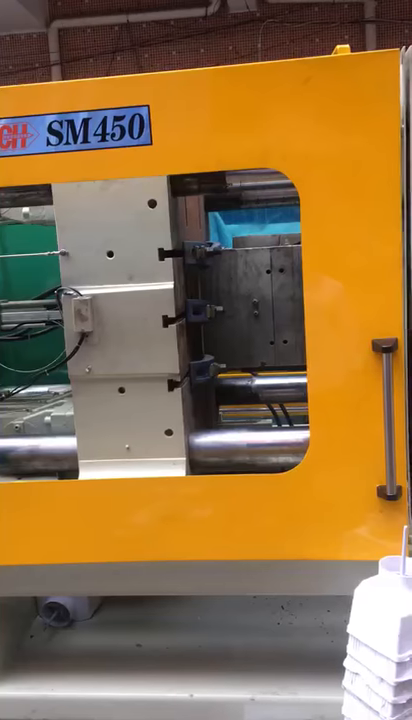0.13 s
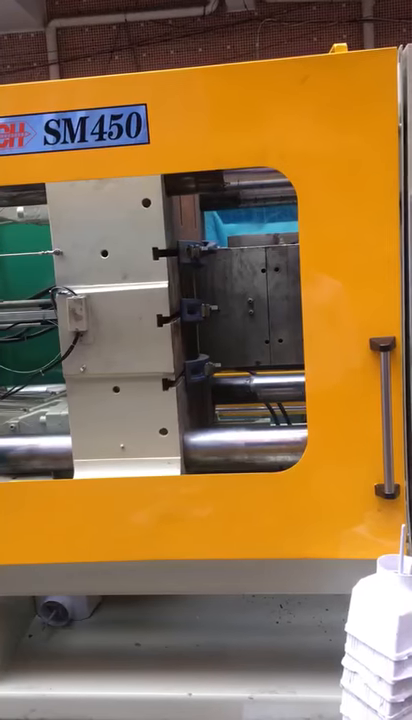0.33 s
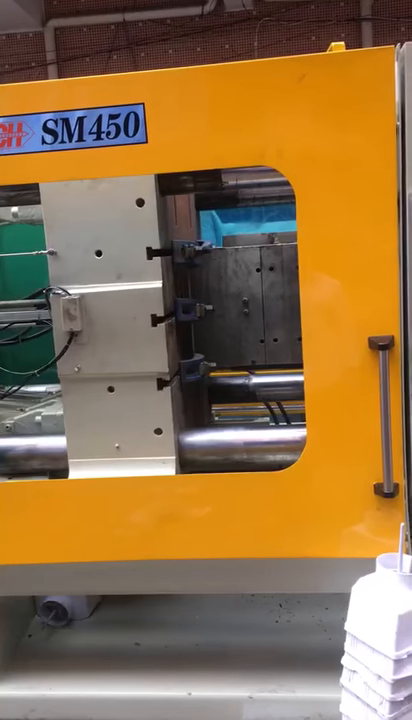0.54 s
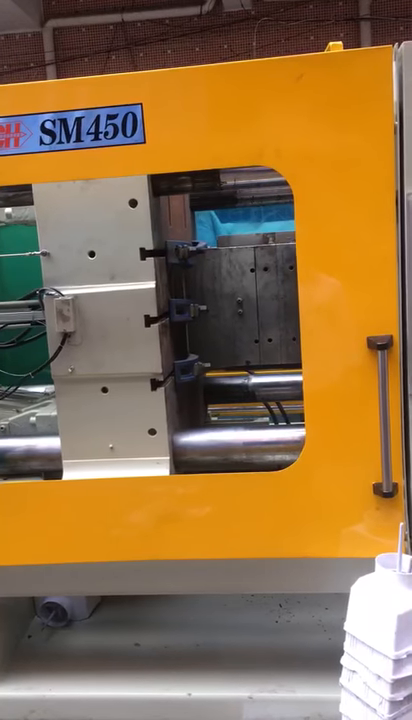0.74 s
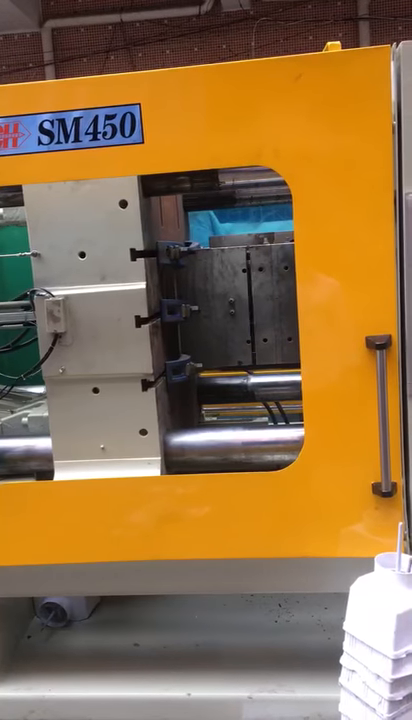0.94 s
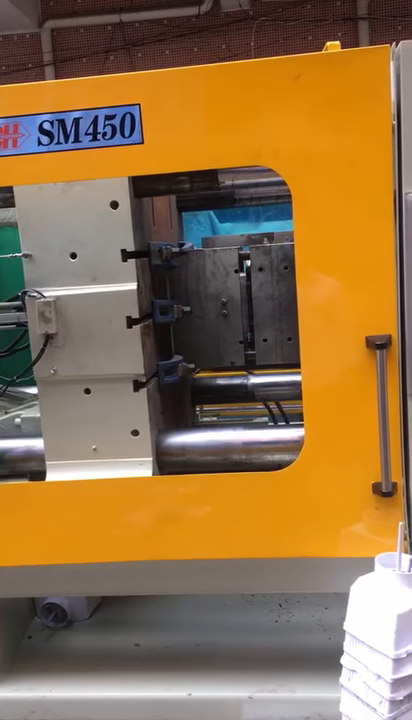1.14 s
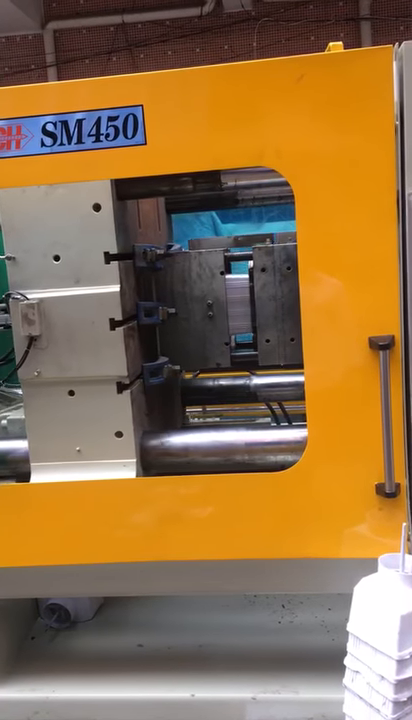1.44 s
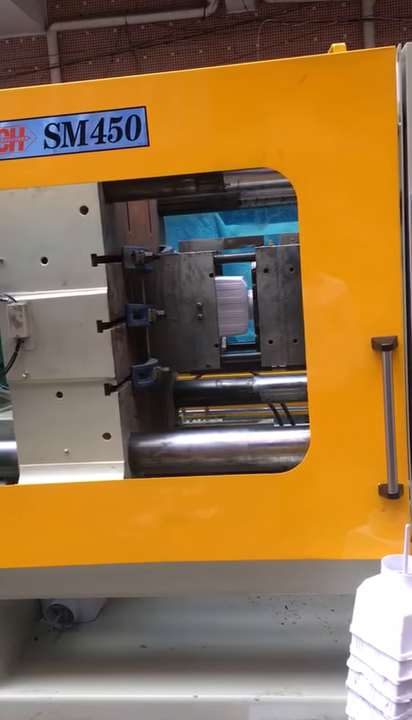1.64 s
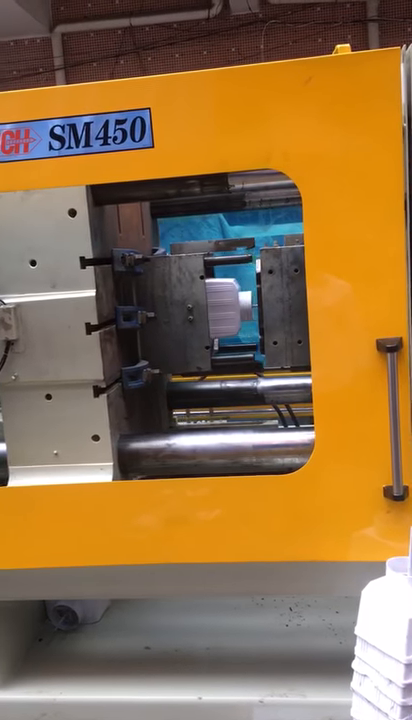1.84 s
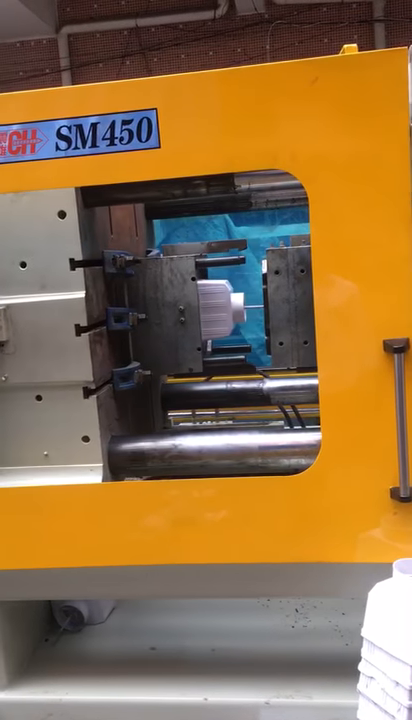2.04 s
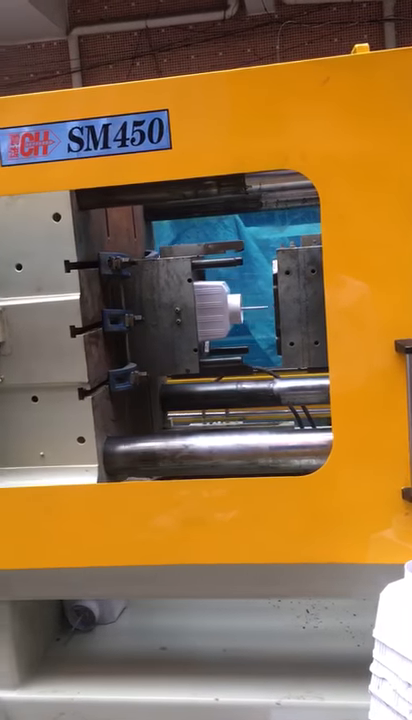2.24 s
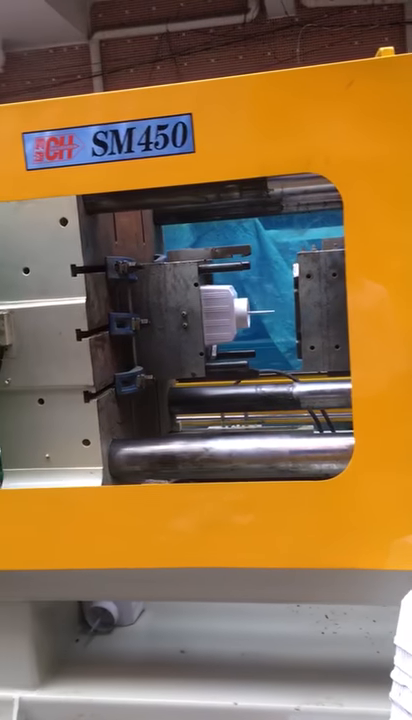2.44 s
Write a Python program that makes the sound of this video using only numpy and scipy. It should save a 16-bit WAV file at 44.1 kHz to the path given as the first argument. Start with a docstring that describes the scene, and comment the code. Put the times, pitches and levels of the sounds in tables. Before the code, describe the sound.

Steady hydraulic pump whine and oil hiss from a factory molding machine, with metallic clunks as it opens

```python
"""A factory hall, one microphone channel: a large molding machine with a twelve-vane hydraulic pump runs.
The pump's whine is a set of tones locked to its shaft, over coloured noise for oil rush and floor rumble.
As the mold unlocks and slides open, linkages rattle (noise bursts) and tick (ringing parts with a crack),
and the frame thumps (decaying low tones). Only the linkage gets a hall tail. The sound starts abruptly."""
import sys
import numpy as np
from scipy import signal
from scipy.fft import rfft, irfft, next_fast_len
from scipy.io import wavfile
from scipy.ndimage import uniform_filter1d, map_coordinates

SR = 44100
rng = np.random.default_rng(int(sys.argv[2]) if len(sys.argv) > 2 else 0)


def int16_out(signal):
    """Quantize to a 16-bit WAV file."""
    q = np.round(np.clip(np.atleast_2d(signal).T, -1, 1) * 32767)
    wavfile.write(sys.argv[1], SR, q.astype(np.int16))


N = 113778
T = np.arange(N) / SR  # time [s]
START_S, TOP_HZ = .1137, 15730  # silence before, nothing above

SHAFT_HZ, VANES = 24.906, 12
VANE_DB, SHAFT_ANGLE = -27.5, 2.87  # vane tone rms at 0 dB pressure; shaft angle at 0 s [rad]
SWAY, SWAY_TWICE = .73, -.13  # phase sway once and twice a turn [rad]
WAVER_DB, WANDER = 1.0, .004  # slow drift of each order: level [dB], phase [rad per order]
# Level swells of the vane tone: (times a turn, depth [fraction], shaft phase [rad])
VANE_SWELLS = [(1, .17, 2.3), (2, .32, -2.15), (3, .05, -.9)]
# Oil pressure, as its effect on the vane tone: (time [s], level [dB])
OIL_PRESSURE = [(.12, -2.5), (.4, 0), (.65, -2.5), (.9, -0.5), (1.2, 1), (1.5, 1), (1.8, 0.5), (2.1, 0.5),
                (2.58, 0.5)]
# Steady tones of the pump: (shaft order, rms level [dB], gain per dB of pressure [dB])
SHAFT_ORDERS = [(1, -44, 2), (16, -46, -1), (18, -58, 0), (24, -48, -.6), (25, -54, 0), (36, -38, 1.3),
                (38, -58, 0), (44, -57, 0), (47, -54, 0), (48, -48, -.5), (50, -58, 0), (59, -56, 0),
                (60, -49, -.6), (65, -62, 0), (71, -59, 0), (72, -43, -.5), (73, -56, 0), (84, -39.5, 0),
                (96, -51, -.6), (97, -54, 0), (101, -55, 0), (103, -57, 0), (105, -58, 0), (108, -47, .8),
                (109, -57, 0), (113, -56, 0), (115, -58, 0), (119, -59, 0), (127, -55, 0), (155, -60, 0),
                (204, -67, 0), (240, -68, 0), (360, -59, .6), (408, -72, 0), (432, -72, 0), (444, -72, 0),
                (456, -71, 0), (468, -69, 0), (481, -72, 0), (492, -73, 0), (504, -69, 0), (516, -71, 0),
                (527, -69, 0), (540, -65, 0), (564, -73, 0), (576, -76, 0), (612, -75, 0), (625, -75, 0)]

# Oil rush and hall noise: (frequency [Hz], density [dB per Hz])
OIL_RUSH = [(150, -61.5), (300, -62.5), (450, -72.5), (800, -74), (1500, -74.5), (2400, -72), (3800, -75),
            (4500, -77.5), (4900, -86), (5300, -82), (6500, -78.5), (7800, -84.5), (9000, -82.5),
            (10000, -84), (10500, -92), (11000, -88), (13400, -88), (14500, -90), (15600, -95)]
# Floor rumble: (frequency [Hz], density [dB per Hz])
FLOOR_RUMBLE = [(15, -68), (28, -51), (48, -54), (62, -55.5), (76, -47), (95, -59.5), (125, -59),
                (165, -56), (210, -69.5), (300, -62)]

# Rattles of loose steel: (time [s], length [s], rms level [dB], rms level of the dull knocking under it [dB])
STEEL_RATTLES = [(.112, .03, -33, -36), (.135, .045, -30, -35), (.18, .06, -38, -36), (.26, .06, -37, -29),
                 (.85, .045, -36.5, -40), (1.042, .008, -42, -50), (1.24, .04, -42, -45),
                 (1.512, .017, -27.5, -37), (1.528, .06, -37, -35), (2.455, .03, -43, -50)]
# Tone of the bright rattle: (frequency [Hz], gain [dB])
STEEL_COLOUR = [(400, -4.5), (1100, -2), (2500, 2), (4200, -6), (9000, -11), (15000, -23.5)]
# Tone of the dull knocking: (frequency [Hz], gain [dB])
DULL_COLOUR = [(110, -12), (250, 2.5), (420, -7.5), (700, -14.5), (1200, -12.5), (2000, -44), (4000, -120)]

# Linkage ticks: (time [s], level before the rise [dB], frequency of the part that rings [Hz])
LINKAGE_TICKS = [(.144, -22, 3720), (0.144, -24.5, 1500), (.165, -19, 4100), (.167, -25, 5700),
                 (.168, -22, 1190), (.272, -27, 2600), (0.284, -24, 2450), (.279, -25, 960),
                 (.855, -34, 3300), (1.043, -19, 2480), (1.042, -25, 3180), (1.513, -16.5, 2180),
                 (1.514, -21, 9800), (1.516, -17, 4390), (1.513, -22, 7900), (1.52, -16, 4290),
                 (1.521, -29, 2330), (1.526, -24, 3040), (2.462, -24.5, 2490)]
TICK_CYCLES = 60  # cycles for a ring to fall 60 dB
CRACK, BLUR = .3, .06  # contact noise against the ring; phase scatter a sample [rad]
# Frame thumps: (time [s], level before the rise [dB], frequency [Hz], rise [s], fall by 60 dB [s])
FRAME_THUMPS = [(.262, -18, 60, .012, .2), (.295, -17, 270, .006, .08), (.3, -20, 144, .012, .45),
                (.675, -17, 58, .012, .15), (.865, -5, 66, .012, .07), (1.523, -8.5, 82, .022, .33),
                (1.636, -12, 80, .04, .3), (1.96, -24, 55, .02, .2)]
HALL_T60_S, HALL_DB = 0.52, -12


def amp(db):
    """Decibels to a linear gain."""
    return 10 ** (np.asarray(db) / 20)


def unit(x):
    """Scale to an rms of one."""
    return x / np.sqrt(np.mean(x ** 2) + 1e-20)


def wobble(rate):
    """A smooth random curve, rate knots a second."""
    knots = rng.standard_normal(int(N * rate / SR) + 4)
    return map_coordinates(knots, [T * rate])


def filtered(x, response):
    """Multiply the spectrum of x by a response of frequency [Hz]."""
    m = next_fast_len(N + SR // 2)
    return irfft(rfft(x, m) * response(np.fft.rfftfreq(m, 1 / SR)), m)[:N]


def colour(points):
    """Gain curve through (Hz, dB) points on a log axis, closed below the first."""
    closed = [(points[0][0] / 2, -140)] + list(points)
    f, db = np.transpose(closed)
    return lambda hz: amp(np.interp(np.log(hz + 1), np.log(f + 1), db))


def noise(points, patchy_db):
    """Coloured noise whose gain varies in random patches of time and frequency."""
    z = signal.stft(rng.standard_normal(N + 512), nperseg=512)[2]
    across_bins = uniform_filter1d(rng.standard_normal(z.shape), 6, 0)
    patches = unit(uniform_filter1d(across_bins, 10, 1))
    white = unit(signal.istft(z * amp(patchy_db * patches), nperseg=512)[1][:N])
    return filtered(white * np.sqrt(SR / 2), colour(points))  # white density is 0 dB per Hz


def vane_tone(turn, pressure_db):
    """The vanes pass twelve times a turn; level and phase sway with the shaft angle."""
    angle = turn + SHAFT_ANGLE
    swell = 1 + sum(depth * np.cos(k * angle + at) for k, depth, at in VANE_SWELLS)
    sway = SWAY * np.sin(angle) + SWAY_TWICE * np.sin(2 * angle)
    tone = unit(swell * np.cos(VANES * turn + sway))
    return -amp(VANE_DB + pressure_db) * tone


def pump():
    """Oil pressure scales the vane tone; the other orders are tones at multiples of the shaft rate."""
    pressure_db = np.interp(T, *np.transpose(OIL_PRESSURE))
    turn = 2 * np.pi * SHAFT_HZ * T
    out = vane_tone(turn, pressure_db)
    drift = WANDER * wobble(3)  # shared by all these orders
    for k, db, follows in SHAFT_ORDERS:
        phase = k * (turn + drift) + rng.uniform(0, 2 * np.pi)
        level_db = db + follows * pressure_db + WAVER_DB * wobble(4)
        out += amp(level_db) * np.sqrt(2) * np.cos(phase)
    return out


def oil_rush():
    """Broad noise of oil flow and hall, its level drifting at two rates."""
    drift_db = 0.13 * wobble(4.05) + 0.59 * wobble(12.26)
    return amp(drift_db) * noise(OIL_RUSH, patchy_db=1.53)


def floor_rumble():
    """Lumpy low noise from the floor, falling away above 300 Hz."""
    return amp(0.5 * wobble(7.18)) * noise(FLOOR_RUMBLE + [(500, -120)], patchy_db=1.5)


def rattles():
    """Dense uneven contacts of loose steel: bursts of bright grains over dull knocking."""
    out = np.zeros(N)
    uneven = rng.standard_normal(N) * amp(1.2 * wobble(500))
    grains = unit(filtered(uneven, colour(STEEL_COLOUR)))
    knocks = unit(filtered(rng.standard_normal(N), colour(DULL_COLOUR)))
    for s, length, db, knock_db in STEEL_RATTLES:
        corners = s + length * np.array([0, .15, .7, 1.3])
        envelope = np.interp(T, corners, [0, 1, 1, 0])
        out += (amp(db) * grains + amp(knock_db) * knocks) * envelope
    return out


def ticks():
    """Each contact cracks briefly and rings one steel part, higher parts dying sooner."""
    out, t = np.zeros(N + SR), T[:SR // 8]
    for s, db, hz in LINKAGE_TICKS:
        scatter = np.cumsum(rng.normal(0, BLUR, len(t)))
        ring = amp(-60 * t * hz / TICK_CYCLES) * np.sin(2 * np.pi * hz * t + scatter)
        crack = CRACK * amp(-60 * t / 0.0047) * rng.standard_normal(len(t))
        rise = 1 - np.exp(-t / 0.00018)
        out[round(s * SR):][:len(t)] += amp(db) * rise * (ring + crack)
    return out[:N]


def hall(x):
    """A dull tail from the hall: low-passed noise with exponential decay."""
    dull = signal.lfilter([1], [1, -.6], rng.standard_normal(SR // 2))
    tail = dull * amp(-60 * T[:SR // 2] / HALL_T60_S)
    late = np.pad(x, (500, 0))  # the tail starts 500 samples after the direct sound
    return signal.fftconvolve(late, tail / np.linalg.norm(tail))[:N]


def thumps():
    """Soft pushes ring the heavy frame as decaying sines."""
    out = np.zeros(N)
    for s, db, hz, rise, t60 in FRAME_THUMPS:
        t = np.maximum(T - s, 0)
        push = 1 - np.exp(-t / rise)
        out += amp(db - 60 * t / t60) * push * np.sin(2 * np.pi * hz * t)
    return out


def scene():
    """Pump, noise and thumps dry; the linkage both direct and through the hall."""
    machine = pump() + oil_rush() + floor_rumble()
    linkage = rattles() + ticks()
    return (machine + linkage + amp(HALL_DB) * hall(linkage) + thumps())[None]


def record(dry):
    """One microphone channel: silent until the abrupt start, nothing above the band limit."""
    started = dry[0] * (T > START_S)
    return filtered(started, lambda hz: hz < TOP_HZ)[None]


dry = scene()
out = record(dry)
int16_out(out)
```